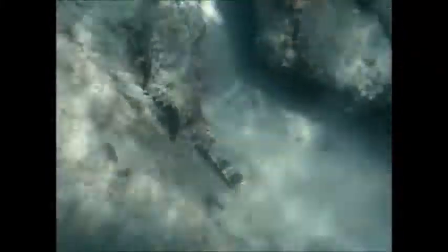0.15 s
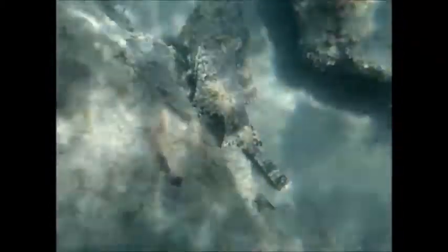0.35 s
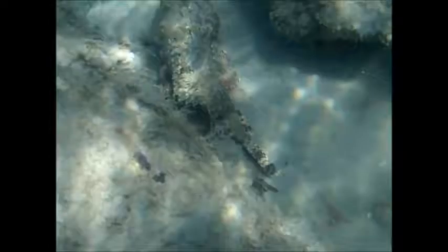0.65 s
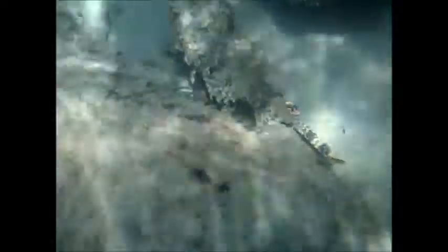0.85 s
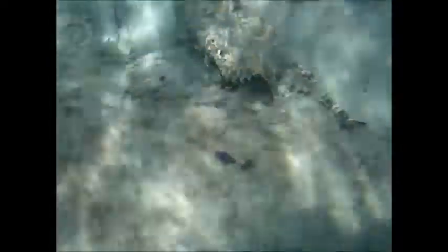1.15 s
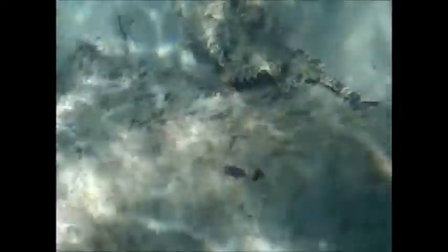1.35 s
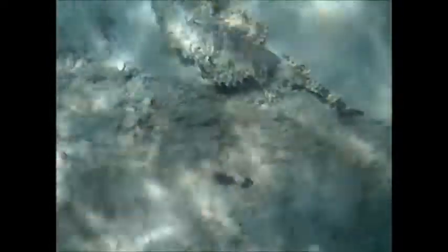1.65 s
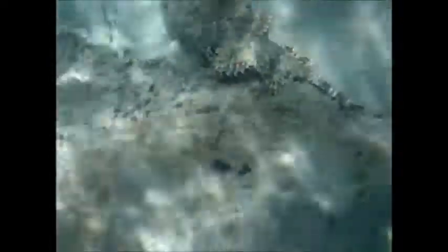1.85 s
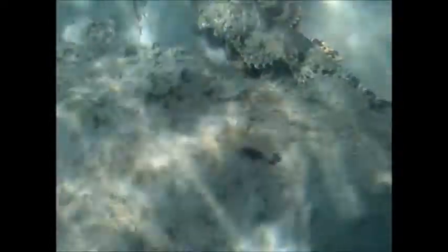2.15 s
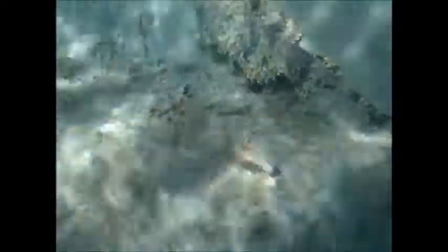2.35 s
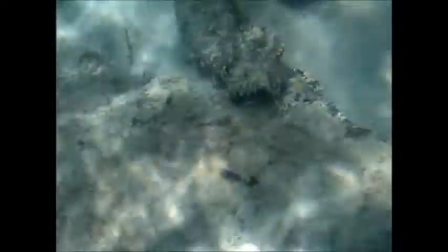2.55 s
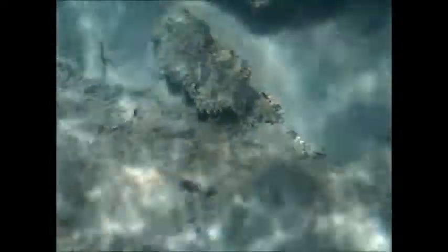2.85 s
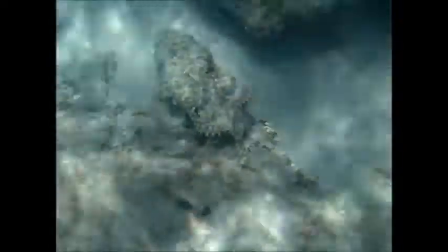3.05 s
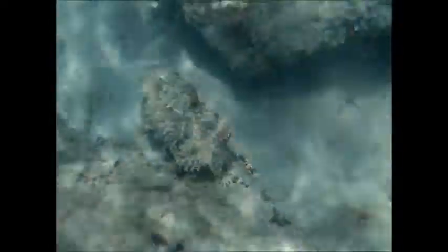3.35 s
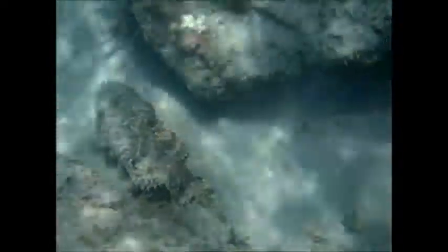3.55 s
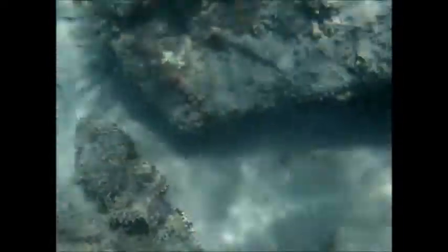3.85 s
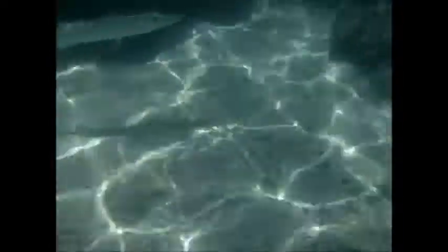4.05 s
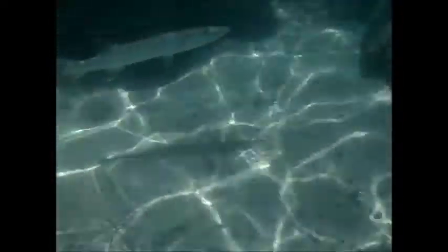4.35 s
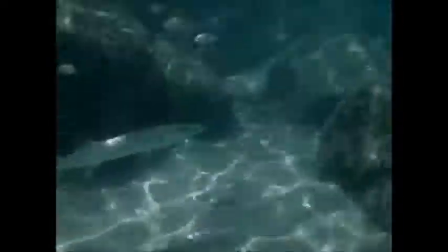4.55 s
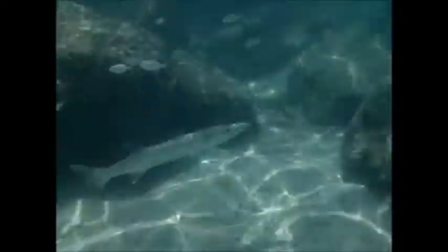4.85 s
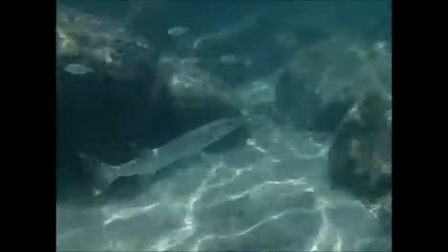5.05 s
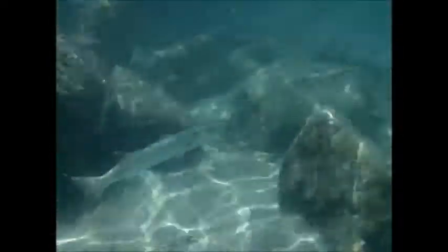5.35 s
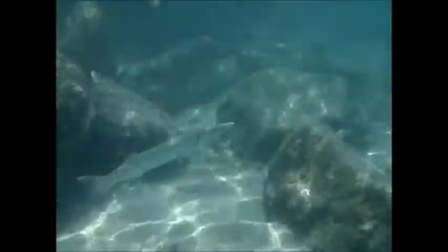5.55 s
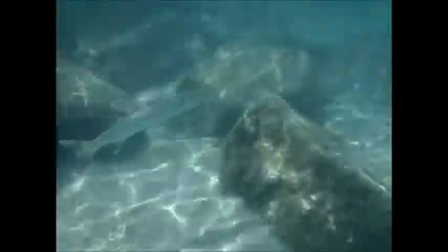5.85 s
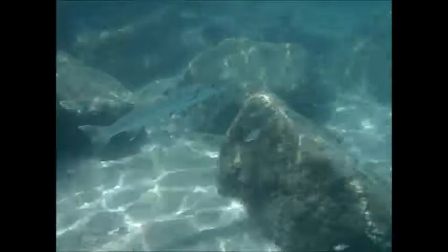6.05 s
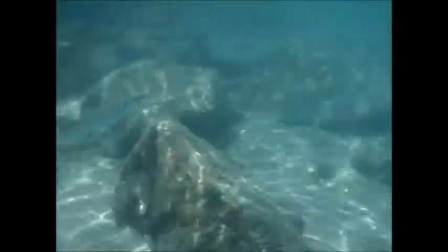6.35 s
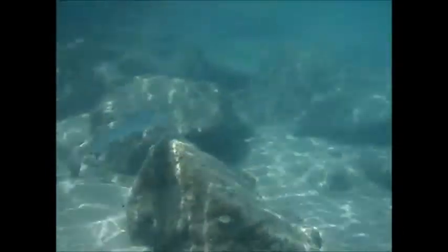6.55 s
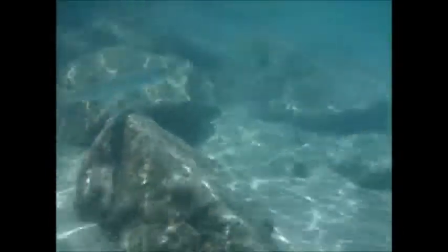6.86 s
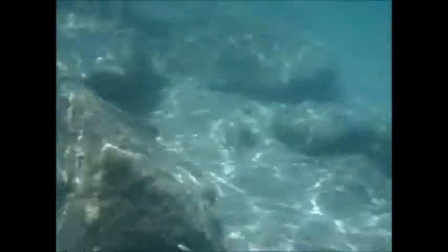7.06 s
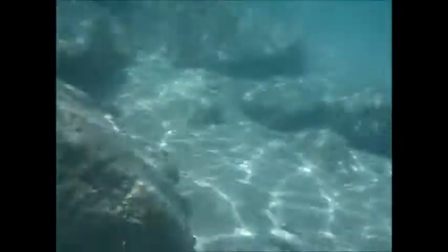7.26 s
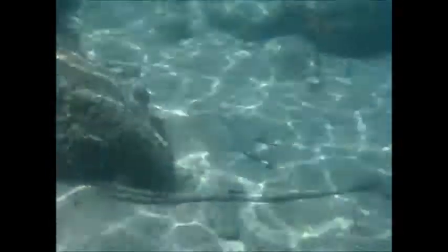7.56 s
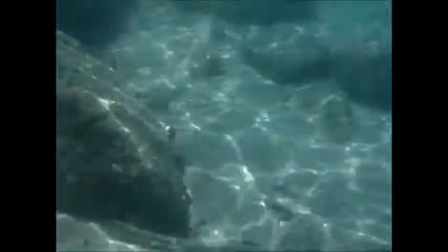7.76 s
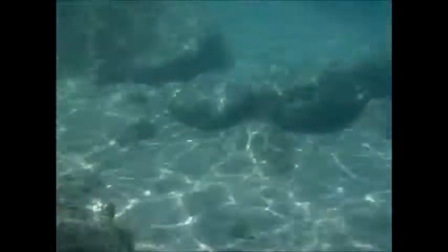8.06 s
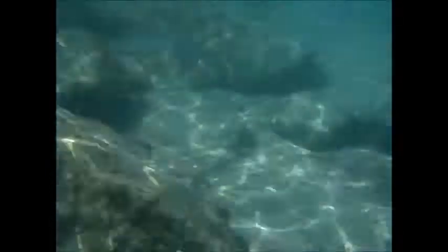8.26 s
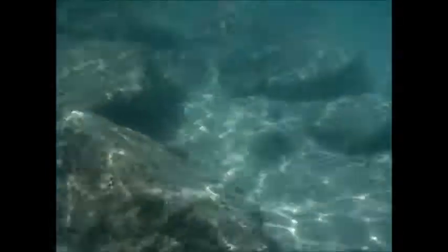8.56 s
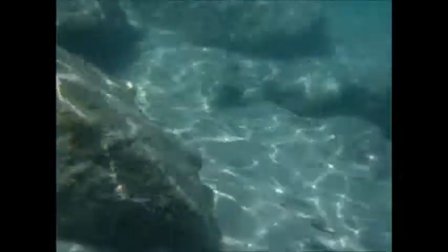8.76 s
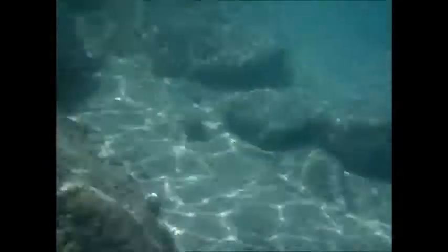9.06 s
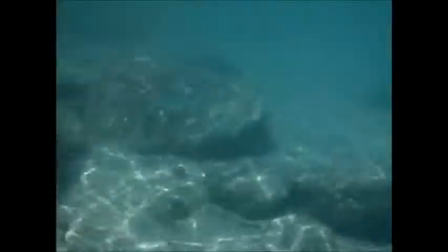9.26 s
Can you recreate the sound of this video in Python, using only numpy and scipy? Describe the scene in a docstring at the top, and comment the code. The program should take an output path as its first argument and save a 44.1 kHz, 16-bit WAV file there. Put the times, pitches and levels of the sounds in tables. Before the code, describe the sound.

Muffled, boxy underwater sound. Over the reef, near and far shrimp snaps tick and sizzle above a steady rumble and the camera's hum, hiss and thin high whine. One hard clack on the case, a blink of silence, then the sand: sparser clicks, faint simmering bubbles, occasional hollow gulps. Finally water surges and froths around the case in an uneven stroke, with a short splash before it subsides.

```python
"""Shallow sea, from a camera in a waterproof case: close over a reef, then, after a short silence, over sand.
Snapping shrimp crackle near and far as sprayed clicks that ring the case; shaped noise is the water rumbling past.
Bubbles plink and gulp as short swelling tones, and the case takes one hard knock, a sum of decaying modes.
Near the end a swimming stroke churns and splashes: dense clicks through the case's resonances.
Underneath lie the camera's own hiss, whine and twitter, and over the reef its motor hum."""
import sys
import numpy as np
from scipy import signal
from scipy.fft import rfft, irfft
from scipy.io import wavfile
from scipy.ndimage import uniform_filter1d

SR = 44100
rng = np.random.default_rng(int(sys.argv[2]) if len(sys.argv) > 2 else 0)


def generate_wav(signal):
    """Clip the signal to [-1, 1] and save it as 16-bit WAV at the path in sys.argv[1]."""
    frames = np.transpose(np.atleast_2d(signal))
    scaled = np.clip(frames, -1, 1) * 32767
    pcm = np.round(scaled).astype(np.int16)
    wavfile.write(sys.argv[1], SR, pcm)


N = 414981
TIME = np.arange(N) / SR
BINS_HZ = np.fft.rfftfreq(16384, 1 / SR)
CUT_S, RESUME_S = 3.872, 3.930  # the reef ends, the sand begins
TOP_HZ = 15800  # nearly nothing passes above this

# Colour of the camera's hiss. Each row: frequency in Hz, relative level in dB.
HISS_COLOUR = [(100, 3), (700, -6), (2500, -2.5), (6000, 1.2), (7900, 2), (8200, -20), (8600, 1.5),
               (10500, 2.3), (15500, -.3)]
# Motor noise as the case carries it. Each row: resonance in Hz, width in Hz, relative level in dB.
MOTOR_MODES = [(211.7, 7.6, -0.5), (227, 86, -7), (377, 65, -9.5), (510.4, 62, -11.5)]
# The motor's tones. Each row: mean pitch in Hz, mean level in dB.
HUM_LINES = [(211, -52.5), (461, -54.5)]
# Thin twitter high in the treble. Each row: time in seconds, centre pitch in Hz, level in dB.
TWITTER = [(0, 10700, -61), (2.4, 10200, -58.5), (3.8, 10700, -62), (4.0, 10000, -58.5),
           (4.5, 11400, -58.5), (4.7, 13000, -66), (5.3, 13000, -68), (5.5, 12600, -62),
           (5.85, 13400, -59.5), (6.35, 11400, -58), (7.2, 12800, -58.5), (8.27, 11500, -59),
           (8.4, 13000, -64), (8.65, 13800, -64), (8.85, 11600, -59.5), (9.4, 13200, -58)]
WHINE_HZ, ZIGZAG_PER_S = 7988, 40
HUM_WAVER_DB, HUM_WAVER_SHARE = 1.5, .004  # level; share of the pitch

# Colour of the flow past the case in each place. Each row: frequency in Hz, relative level in dB.
REEF_FLOW_COLOUR = [(15, -8), (28, 1.5), (50, -4), (100, -11), (170, -11.5), (260, -25.5), (400, -37.5),
                    (700, -44), (1500, -55)]
SAND_FLOW_COLOUR = [(12, -27), (20, 0.5), (49, -7.5), (75, -8), (97, -13.5), (236, -17.5), (323, -29.5),
                    (544, -35), (700, -47), (910, -68), (1540, -120)]
# Surges of that flow. Each row: crest in seconds, level in dB, build in seconds, ebb in seconds.
SURGES = [(3.745, -35, 0.04, 0.065), (7.1, -45, 0.1, 0.35), (8.22, -32, 0.04, 0.12),
          (8.3, -41.5, 0.55, 1.6)]
# Spells of larger eddies that buffet the case. Each row: start of hold in seconds, hold in seconds, level in dB.
EDDIES = [(6.99, .45, -55), (8.188, 0.078, -37), (8.585, 0.15, -58), (9.03, 0.25, -47)]
# Swirls that brush the case. Each row: start of hold in seconds, hold in seconds, level in dB.
SWIRLS = [(0.394, 0.031, -44.5), (4.024, 0.0067, -51), (5.138, 0.065, -49.5), (6.074, 0.35, -54.5),
          (6.763, 0.046, -49), (6.932, 0.067, -53), (7.406, 0.096, -41.5), (8.22, 0.015, -48),
          (8.343, 0.025, -47), (8.508, 0.019, -43), (8.678, 0.078, -39.5), (9.138, 0.054, -51.5),
          (9.28, 0.16, -56.5)]
# The case buffeted by larger eddies. Each row: resonance in Hz, width in Hz, relative level in dB.
GURGLE_MODES = [(95, 160, 10.5), (195, 86, 7), (340, 120, -19), (491, 50, -5), (850, 610, -17.5)]
# The case pelted by froth. Each row: resonance in Hz, width in Hz, relative level in dB.
CHURN_MODES = [(328, 240, -5), (531, 78, 3.5), (880, 70, -9), (1170, 97, 11), (1450, 335, 3),
               (1830, 110, 0), (2860, 190, -24), (3320, 220, -22), (3740, 200, -19)]
# The case sprayed by the splash. Each row: resonance in Hz, width in Hz, relative level in dB.
SPLASH_MODES = [(457, 170, -7), (1166, 130, 4.5), (1550, 200, 5), (1780, 200, 0.5), (2800, 170, -15.5),
                (3740, 350, -21)]
REEF_FLOW_DB, SAND_FLOW_DB, FLOW_WANDER_DB = -44.3, -46, .8
EDDY_BUILD_S, EDDY_EBB_S, SWIRL_BUILD_S, SWIRL_EBB_S = 0.02, 0.094, 0.004, 0.018
# The swimming stroke: its eddies arrive ahead of its bubbles, and both come unevenly.
STROKE_S, STROKE_BUILD_S, STROKE_HOLD_S, STROKE_EBB_S = 8.334, 0.33, 0.69, 0.13
GURGLE_BUILD_S, STROKE_UNEVEN_DB = 1, 2.2
GURGLE_DB, FROTH_DB = -43.5, -42.5  # its eddies and its tiny bubbles
SPLASH_S, SPLASH_HOLD_S, SPLASH_DB = 8.893, 0.138, -36.5

# Small bubbles at the case. Each row: start in seconds, level in dB before trim, pitch in Hz, swell in seconds.
PLINKS = [(0.137, -23, 1080, 0.002), (0.387, -28, 1140, 0.0048), (0.417, -23, 1142, 0.0016),
          (.853, -27.5, 1166, 0.0037), (1.091, -22.5, 1215, 0.0021), (1.102, -26.5, 1158, 0.0047),
          (4.043, -30.5, 1180, 0.0011), (5.179, -23, 1210, 0.0017), (5.193, -22, 1270, 0.0019),
          (5.7102, -19, 1155, 0.003), (5.965, -28.5, 1230, 0.0035), (6.08, -26.5, 1260, .0035),
          (6.116, -31.5, 1265, 0.0055), (6.171, -26.5, 1248, 0.0056), (6.249, -36, 1320, 0.0027),
          (6.768, -18, 1145, 0.002), (6.782, -27, 1140, .002), (6.7998, -22, 1155, 0.0018),
          (6.9457, -19.5, 1146, 0.0016), (6.9692, -22, 1210, 0.0012), (6.982, -22.5, 1180, .0014),
          (7.328, -18.5, 1300, 0.0011), (7.411, -11.5, 1155, 0.0023), (7.4342, -19, 1330, 0.0026),
          (7.456, -15, 1135, 0.0014), (7.482, -19.5, 1220, 0.0012), (7.503, -25, 1180, 0.0021),
          (7.522, -27, 1160, 0.0016), (7.955, -21.5, 1140, .002), (8.35, -28, 1160, .003),
          (8.373, -30, 1130, 0.0024), (8.474, -22, 1237, 0.0037), (8.525, -31, 1224, 0.0034),
          (8.541, -22.5, 1184, 0.0026), (8.608, -32, 1165, .007), (8.685, -27, 1180, 0.0032),
          (8.703, -29, 1220, .004), (8.774, -33, 1186, 0.0025), (8.9237, -8, 1134, 0.005)]
# Large air pockets, and at 8.16 s a low push of water as the stroke begins. Each row: start in seconds, level
# in dB before trim, pitch in Hz, swell in seconds,
GULPS = [(.829, -41.5, 806, 0.007, 0.038), (1.055, -18, 270, 0.0018, -0.16),
         (1.057, -26, 520, 0.0022, 0.02), (1.059, -26.5, 754, 0.0017, -0.028),
         (2.610, -25.5, 270, 0.0024, 0.0023), (2.615, -29.5, 445, 0.0067, -0.17),
         (2.628, -31, 350, 0.0043, -0.13), (4.033, -37, 174, 0.0041, -0.059),
         (4.043, -37.5, 463, 0.00059, -0.0022), (4.867, -21, 258, 0.0019, 0.037),
         (6.314, -35, 326, 0.0024, -0.067), (7.415, -28.5, 217, 0.0091, 0.0062),
         (7.933, -26.5, 261, 0.0038, -0.01), (8.160, -33, 45, 0.0079, -.08),
         (8.177, -20, 234, 0.0015, -0.051), (8.226, -30.5, 144.6, 0.012, -.08),
         (8.578, -30, 295, 0.0043, -0.049), (8.642, -31.5, 400, 0.0022, -.08),
         (8.678, -27.5, 304, 0.0027, -0.16), (8.739, -31, 383, 0.0045, -.08),
         (8.826, -23, 317, 0.0022, -0.029), (8.831, -16.5, 208, 0.0051, -0.18),
         (8.98, -27, 400, 0.0018, -0.24)]
SIMMER_DB, SIMMER_LOW_HZ, SIMMER_HIGH_HZ = -58.5, 1173, 1950  # tiny bubbles over the sand
TUMBLE_DB, TUMBLE_LOW_HZ, TUMBLE_HIGH_HZ = -48, 280, 560  # middling bubbles in the stroke

# The case when struck. Each row: mode in Hz, relative level in dB, 60 dB decay in seconds.
KNOCK_MODES = [(199, -23, 0.14), (324, -35, 0.013), (835, -20, 0.021), (1179, -6, 0.027),
               (1300, 5.5, 0.0079), (1700, -14, 0.018), (2200, -16, 0.0084), (2900, -17.5, 0.0064),
               (4000, -17.5, 0.0065)]
KNOCK_S, KNOCK_DB = 3.7198, 3

# The case as shrimp excite it in each place. Each row: resonance in Hz, width in Hz, relative level in dB.
REEF_MODES = [(1170, 99, 6), (1482, 280, -0.5), (1681, 137, 3.5), (2252, 163, -8), (3000, 280, -8),
              (3854, 340, -4), (4516, 426, -8.5), (5920, 350, -17), (7060, 300, -17)]
SAND_MODES = [(1264, 145, 3), (1795, 172, 7), (3130, 240, -20.5), (3490, 1180, -16), (4016, 420, -8.5),
              (4870, 540, -17.5), (6300, 1400, -20)]
# The crowd of far shrimp in each place. Each row: time in seconds, level in dB.
REEF_CROWD = [(0, -44), (.45, -46), (1.1, -44), (1.55, -43.5), (2.1, -46.5), (3.7, -45)]
SAND_CROWD = [(3.95, -53.5), (5.1, -55), (6.15, -49.5), (6.6, -52.5), (7.8, -51.5), (9.4, -50.5)]
# The nearest snaps. Each row: start in seconds, ring level in dB, ring pitch in Hz, crack level in dB;
# levels are over the first SNAP_S, before each place's trim.
SNAPS = [(0.3835, -32, 1540, -44), (0.646, -42, 1440, -41.5), (0.7104, -44, 1640, -43),
         (1.026, -41, 1570, -43.5), (1.245, -41, 1460, -46), (1.284, -39.5, 1650, -42.5),
         (1.313, -43, 1660, -49), (1.3943, -37, 1370, -48), (1.449, -35.5, 1620, -38.5),
         (1.465, -43.0, 1480, -45), (1.476, -30.5, 1470, -38.5), (1.503, -40, 1490, -38.5),
         (1.5295, -45, 1630, -39), (1.546, -41, 1530, -42), (1.646, -36.0, 1480, -52),
         (1.72, -49.5, 1650, -46), (1.739, -39, 1520, -39.5), (1.8204, -32.5, 1670, -35),
         (1.8324, -39, 1540, -43), (1.8486, -40, 1410, -44), (2.0064, -54, 1640, -40.5),
         (2.042, -33.5, 1610, -38.5), (2.19, -40, 1580, -41), (2.2503, -36, 1530, -45),
         (2.2918, -45.5, 1480, -39), (2.321, -35, 1580, -56), (2.343, -55, 1630, -42),
         (2.389, -51.5, 1400, -42.5), (2.6906, -35, 1550, -38.5), (2.6998, -40.0, 1430, -48),
         (2.777, -38, 1580, -58), (2.874, -32, 1520, -41), (3.0054, -34.5, 1570, -35),
         (3.077, -42, 1510, -44), (3.2432, -41.0, 1530, -41.5), (3.3442, -37.5, 1780, -44),
         (3.4172, -30, 1610, -32.5), (3.541, -65, 1620, -41.5), (3.754, -37.5, 1630, -40.5),
         (3.965, -43.0, 1750, -53), (4.0042, -41.5, 1780, -51.5), (4.085, -61, 1500, -46.5),
         (4.197, -46, 1720, -50), (4.362, -44, 1620, -56), (4.374, -35, 1730, -44.5),
         (4.422, -59, 1660, -45.5), (4.5777, -39, 1800, -54), (4.6239, -36, 1770, -45.5),
         (4.668, -37, 1790, -51), (4.784, -45.5, 1800, -49.5), (4.991, -33, 1590, -43.5),
         (5.035, -41, 1730, -44.5), (5.044, -39.5, 1690, -47), (5.209, -43, 1450, -46),
         (5.3277, -43, 1810, -47.5), (5.4502, -44, 1630, -50), (5.611, -46, 1430, -59),
         (5.693, -48, 1680, -46.5), (5.822, -37.5, 1560, -49.5), (5.911, -39, 1730, -57),
         (6.0195, -44, 1750, -49), (6.141, -49, 1500, -46), (6.316, -39.5, 1810, -58),
         (6.6241, -31.0, 1760, -52), (6.724, -36.5, 1620, -46.5), (6.8315, -43, 1680, -47),
         (6.9408, -39, 1250, -57), (6.9772, -40, 1350, -46.5), (7.057, -41.5, 1810, -60),
         (7.152, -35.0, 1690, -47.5), (7.178, -38.5, 1750, -45.0), (7.251, -46, 1710, -48),
         (7.32, -34.5, 1450, -58), (7.376, -38.5, 1340, -50), (7.7115, -47.5, 1520, -47.5),
         (8.038, -44, 1490, -46), (8.071, -36, 1730, -51.5), (8.4327, -54, 1320, -50),
         (8.457, -35, 1620, -38), (8.508, -27.0, 1760, -42.5), (8.5795, -31.5, 1630, -52),
         (8.7424, -37, 1520, -45), (8.8272, -29, 1460, -64.0), (8.917, -30, 1320, -49)]
SNAP_S, SNAP_HZ, SNAP_SPREAD_OCT = .01, 3600, 0.4  # level window; middle and spread of the crack's pitch


def undb(db):
    """Decibels to gain."""
    return 10 ** (np.asarray(db) / 20)


def unit(x):
    """Scale to rms 1."""
    return x / np.sqrt(np.mean(x ** 2))


def walk(rate):
    """Random levels held 1 / rate s and slewed twice; rms 1."""
    hold = int(SR / rate)
    steps = np.repeat(rng.standard_normal(N // hold + 1), hold)
    return unit(uniform_filter1d(uniform_filter1d(steps, hold), hold)[:N])


def swell(s, build_s, hold_s, ebb_s):
    """A gain that grows to 1 at time s, holds and dies away."""
    away = np.maximum(s - TIME, 0) / build_s + np.maximum(TIME - s - hold_s, 0) / ebb_s
    return np.exp(-np.minimum(away, 20))


def curve(rows):
    """Gain along a table of (s, dB)."""
    return undb(np.interp(TIME, *np.transpose(rows)))


def filtered(x, order, hz, kind="low"):
    """Butterworth filter."""
    return signal.sosfilt(signal.butter(order, hz, kind, fs=SR, output="sos"), x)


def tone(hz):
    """A sine that follows a varying pitch."""
    return np.sin(2 * np.pi * np.cumsum(hz) / SR)


def ring(x, impulse):
    """Pass x through an impulse response."""
    return signal.oaconvolve(x, impulse)[:len(x)]


def response(gain):
    """The causal, minimum-phase impulse response with this gain at BINS_HZ."""
    cepstrum = irfft(np.log(gain + 1e-6))
    half = len(cepstrum) // 2
    cepstrum[1:half] *= 2
    cepstrum[half + 1:] = 0
    return irfft(np.exp(rfft(cepstrum)))[:half]


def resonant(modes):
    """Impulse response of steep-sided resonances over a faint flat floor."""
    power = sum(undb(db) ** 2 / (1 + ((BINS_HZ - hz) / width) ** 2 / 2) ** 4 for hz, width, db in modes)
    return response(np.sqrt(power) + undb(-38.0))


def coloured(points):
    """Noise of rms 1 with a spectrum of (Hz, dB) points."""
    hz, db = np.transpose(points)
    level_db = np.interp(np.log(BINS_HZ + 1), np.log(hz), db)
    return unit(ring(rng.standard_normal(N), response(undb(level_db))))


def add(out, s, sound):
    """Mix a sound in at time s."""
    i = max(int(s * SR), 0)
    out[i:i + len(sound)] += sound[:N - i]


def pops(rate, spread_db, range_db):
    """Random impulses, rate a second; a few stand up to range_db above the rest, or below if spread_db < 0."""
    chance, size = rng.random(N), rng.exponential(size=N)
    return (chance < rate / SR) * undb(range_db * np.tanh(spread_db * size / range_db))


def scatter(clicks, rise_s, tail_s):
    """Smear each click into a short spray of noise, as echoes from bottom and surface do."""
    t = TIME[:SR // 16]
    spray = (1 - np.exp(-t / rise_s)) * np.exp(-t / tail_s)
    power = ring(clicks ** 2, spray ** 2)
    return np.sqrt(np.abs(power)) * rng.standard_normal(len(clicks))


def hum():
    """The motor's two tones, wavering slightly in level and pitch."""
    out = np.zeros(N)
    for hz, db in HUM_LINES:
        out += undb(db + HUM_WAVER_DB * walk(4.7)) * tone(hz * (1 + HUM_WAVER_SHARE * walk(9)))
    return out


def twitter(swing_hz):
    """A faint high tone that zigzags quickly around a drifting centre and flutters in level."""
    times, hz, db = np.transpose(TWITTER)
    zigzag = tone(ZIGZAG_PER_S * (1 + .3 * walk(40))) + .6 * walk(260) + .45 * walk(1500)
    flutter = unit(undb(1.2 * walk(14) + 3 * walk(90)))
    pitch_hz = np.interp(TIME, times, hz) + swing_hz * zigzag
    return flutter * undb(np.interp(TIME, times, db)) * tone(pitch_hz)


def camera():
    """Slightly fluttering hiss, a thin steady whine and the twitter; the motor hums over the reef only."""
    hiss = coloured(HISS_COLOUR) * undb(-59.8) * undb(1.2 * walk(70))
    whine = undb(-57.5) * np.sin(2 * np.pi * WHINE_HZ * TIME)
    motor = unit(ring(rng.standard_normal(N), resonant(MOTOR_MODES))) * undb(-46.5)
    return hiss + whine + twitter(swing_hz=1100) + (motor + hum()) * (TIME < CUT_S)


def flow():
    """Eddies of the passing water rumble on the case, wandering in level and surging at times."""
    over_reef = TIME < CUT_S
    steady = undb(np.where(over_reef, REEF_FLOW_DB, SAND_FLOW_DB) + FLOW_WANDER_DB * walk(3.75))
    surges = sum(undb(db) * swell(s, build_s, 0, ebb_s) for s, db, build_s, ebb_s in SURGES)
    rumble = np.where(over_reef, coloured(REEF_FLOW_COLOUR), coloured(SAND_FLOW_COLOUR))
    return rumble * np.hypot(steady, surges) * undb(1.5 * walk(13))


def churn():
    """Churned water buffets the case in lumps and, like each swirl, pelts it with tiny bubbles."""
    lumps = scatter(pops(rate=290, spread_db=-0.5, range_db=24.5), rise_s=0.001, tail_s=0.0056)
    stroke = undb(GURGLE_DB) * swell(STROKE_S, GURGLE_BUILD_S, STROKE_HOLD_S, STROKE_EBB_S)
    eddies = sum(undb(db) * swell(s, EDDY_BUILD_S, hold_s, EDDY_EBB_S) for s, hold_s, db in EDDIES)
    gurgle = unit(ring(lumps, resonant(GURGLE_MODES))) * np.hypot(stroke, eddies)
    fizz = scatter(pops(rate=900, spread_db=2.0, range_db=7.0), rise_s=0.0001, tail_s=0.003)
    froth = undb(FROTH_DB) * swell(STROKE_S, STROKE_BUILD_S, STROKE_HOLD_S, STROKE_EBB_S)
    swirls = sum(undb(db) * swell(s, SWIRL_BUILD_S, hold_s, SWIRL_EBB_S) for s, hold_s, db in SWIRLS)
    pelting = unit(ring(fizz, resonant(CHURN_MODES))) * (froth + swirls)
    return undb(STROKE_UNEVEN_DB * walk(30)) * (gurgle + pelting)


def splash():
    """A spray of froth that sets in quickly, comes in clumps and stops short."""
    spray = scatter(pops(rate=450, spread_db=5, range_db=10), rise_s=0.00024, tail_s=0.0022)
    clumps = spray * undb(1.5 * walk(60))
    sprayed = unit(ring(clumps, resonant(SPLASH_MODES)))
    return sprayed * undb(SPLASH_DB) * swell(SPLASH_S, 0.014, SPLASH_HOLD_S, .012)


def bubble(db, hz, swell_s, slide=0):
    """A bubble swells for a moment and dies away; its wall wobbles, and a large one may slide in pitch."""
    t = TIME[:SR // 10]
    age = t / max(swell_s, 1 / SR)
    phase = 2 * np.pi * np.cumsum(hz * (1 + slide * np.tanh(age - 1))) / SR
    wobble = .4 * np.interp(t * hz, np.arange(256), rng.standard_normal(256))  # a new value each cycle
    envelope = (age * np.exp(1 - age)) ** 1.12
    return undb(db) * envelope * (np.sin(phase) + wobble * np.cos(phase))


def bubbles(low_hz, high_hz, swell_s, spread_db, count):
    """Random bubbles between two pitches, many faint and a few clear; rms 1."""
    out = np.zeros(N)
    for when, pitch, size in rng.random((count, 3)):
        hz = low_hz * (high_hz / low_hz) ** pitch
        add(out, when * TIME[-1], bubble(spread_db * size ** 4, hz, swell_s))
    return unit(filtered(out, 4, .85 * low_hz, "high"))


def bubbling():
    """Tiny bubbles simmer over the sand; larger ones tumble while the stroke lasts."""
    simmer = bubbles(SIMMER_LOW_HZ, SIMMER_HIGH_HZ, swell_s=0.0024, spread_db=17, count=400)
    tumble = bubbles(TUMBLE_LOW_HZ, TUMBLE_HIGH_HZ, swell_s=0.0034, spread_db=15.5, count=450)
    in_stroke = swell(STROKE_S, 0.095, STROKE_HOLD_S, .07)
    return simmer * undb(SIMMER_DB) * (TIME > CUT_S) + tumble * undb(TUMBLE_DB) * in_stroke


def plinks(trim_db, lowest_hz, tap_db):
    """Small bubbles plink; the case passes only a faint tap below their pitch."""
    out = np.zeros(N)
    for s, db, hz, swell_s in PLINKS:
        add(out, s, bubble(db + trim_db, hz, swell_s))
    return filtered(out, 7, lowest_hz, "high") + undb(tap_db) * filtered(out, 4, 600)


def gulps(trim_db, thud_db, soft_hz):
    """Large pockets mostly sag in pitch as they gulp, and each shoves the case with a soft thud."""
    out, case = np.zeros(N), resonant(GURGLE_MODES)
    for s, db, hz, swell_s, slide in GULPS:
        shove = scatter(signal.unit_impulse(SR // 16), rise_s=0.00046, tail_s=0.0085)
        thud = filtered(ring(shove, case), 3, soft_hz)
        add(out, s, filtered(bubble(db + trim_db, hz, swell_s, slide), 4, 2.02 * hz))
        add(out, s, undb(db + thud_db) * thud / abs(thud).max())
    return out


def knock(contact_s, lowest_hz):
    """One hard blow on the case: a short clack with little just below it, and a low after-ring."""
    out, t = np.zeros(N), TIME[:SR // 3]
    onset = (1 - np.exp(-t / contact_s)) ** 2
    for hz, db, t60 in KNOCK_MODES:
        mode = undb(db - 60 * t / t60) * np.sin(2 * np.pi * hz * t) * onset
        if hz > lowest_hz:
            mode = filtered(mode, 3, lowest_hz, "high")
        add(out, KNOCK_S, undb(KNOCK_DB) * mode)
    return out


def far_shrimp(case, rate, spread_db, range_db, blur_db, ticks_db):
    """A crackle of snaps; some arrive as thin dry ticks, and the farthest merge into a sizzle."""
    crackle = unit(scatter(pops(rate, spread_db, range_db), rise_s=0.0002, tail_s=0.0045))
    ticks = scatter(pops(rate=70, spread_db=7, range_db=17), rise_s=0.0001, tail_s=0.0011)
    ticks = undb(ticks_db) * unit(filtered(ticks, 2, (3000, 6500), "band"))
    sizzle = undb(blur_db + 5.2 * walk(18)) * rng.standard_normal(N)
    return unit(ring(crackle + ticks + sizzle, case))


def early_unit(x):
    """Scale to rms 1 over the first SNAP_S."""
    return x / np.sqrt(np.mean(x[:int(SNAP_S * SR)] ** 2))


def near_shrimp(snaps, case, body_db, crack_db, echo_db, echo_s):
    """Each snap hits the case at once, then as a spray of echoes; it rings low and cracks high."""
    out, t = np.zeros(N), TIME[:SR // 16]
    for s, db, ring_hz, treble_db in snaps:
        echoes = rng.standard_normal(len(t)) * np.exp(-t / echo_s) * (1 - np.exp(-t / 0.00048))
        echoes = undb(echo_db) * echoes / np.linalg.norm(echoes)
        rung = ring(signal.unit_impulse(len(t)) + echoes, case)
        bright_hz = SNAP_HZ * 2 ** (SNAP_SPREAD_OCT * np.clip(rng.standard_normal(), -2, 2))
        body = signal.lfilter(*signal.iirpeak(ring_hz, 2.5, fs=SR), filtered(rung, 4, 2400))
        crack = signal.lfilter(*signal.iirpeak(bright_hz, .9, fs=SR), filtered(rung, 4, 2400, "high"))
        add(out, s, undb(db + body_db) * early_unit(body) + undb(treble_db + crack_db) * early_unit(crack))
    return out


def reef_shrimp():
    """Far and near shrimp over the reef, through the case as it rings there."""
    case = resonant(REEF_MODES)
    crowd = far_shrimp(case, rate=190, spread_db=6.5, range_db=19, blur_db=-5, ticks_db=-8.5)
    snaps = [row for row in SNAPS if row[0] < CUT_S]
    near = near_shrimp(snaps, case, body_db=-2, crack_db=-0.5, echo_db=1, echo_s=.0045)
    return crowd * curve(REEF_CROWD) + near


def sand_shrimp():
    """Far and near shrimp over the sand, through the case as it rings there."""
    case = resonant(SAND_MODES)
    crowd = far_shrimp(case, rate=100, spread_db=10, range_db=19, blur_db=-8, ticks_db=-7)
    snaps = [row for row in SNAPS if row[0] > CUT_S]
    near = near_shrimp(snaps, case, body_db=-2.5, crack_db=0, echo_db=1.5, echo_s=.0045)
    return crowd * curve(SAND_CROWD) + near


def scene():
    """Reef, then sand, with water and camera throughout."""
    water = flow() + churn() + splash()
    air = plinks(trim_db=-6.5, lowest_hz=1007, tap_db=-5.5) + bubbling()
    air += gulps(trim_db=-1, thud_db=-7.5, soft_hz=435)
    blow = knock(contact_s=0.00076, lowest_hz=700)
    shrimp = np.where(TIME < CUT_S, reef_shrimp(), sand_shrimp())
    return (camera() + water + air + blow + shrimp)[None]


def record(dry):
    """A moment of silence between the two places; the top is cut."""
    live = uniform_filter1d(((TIME < CUT_S) | (TIME > RESUME_S)) * 1., size=64)
    return signal.sosfilt(signal.ellip(10, .2, 70, TOP_HZ, fs=SR, output="sos"), dry * live)


dry = scene()
out = record(dry)
generate_wav(out)
```